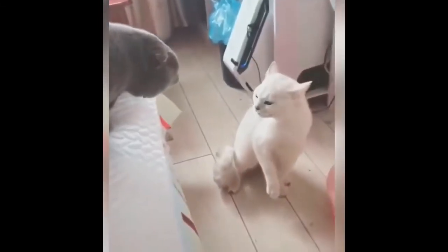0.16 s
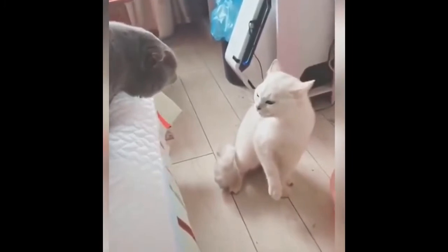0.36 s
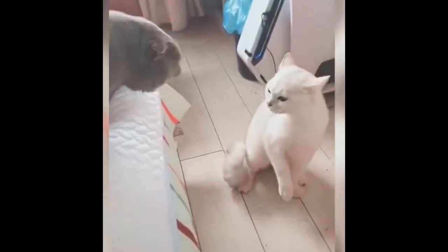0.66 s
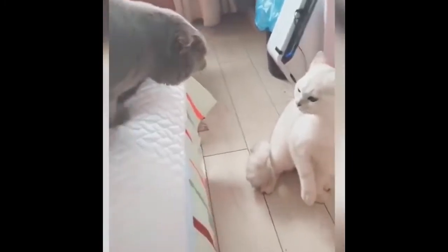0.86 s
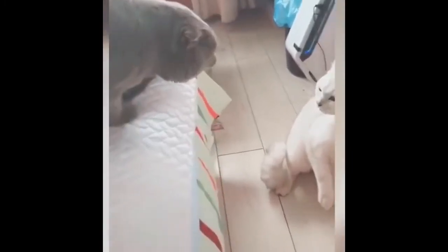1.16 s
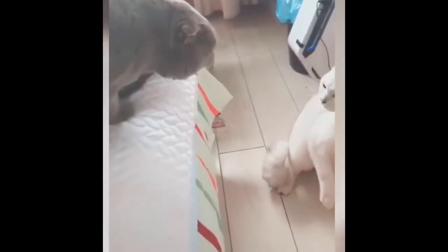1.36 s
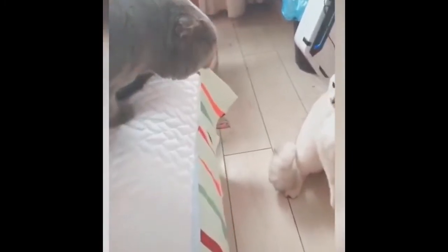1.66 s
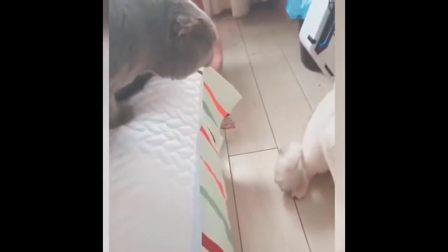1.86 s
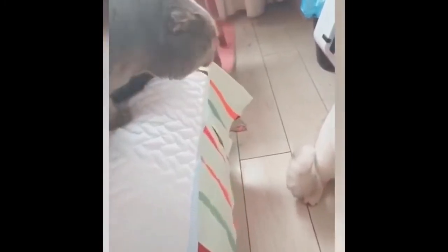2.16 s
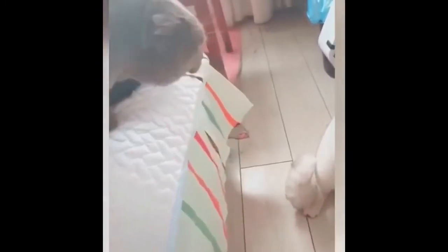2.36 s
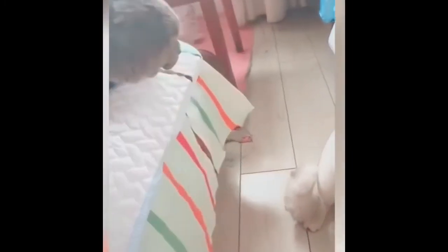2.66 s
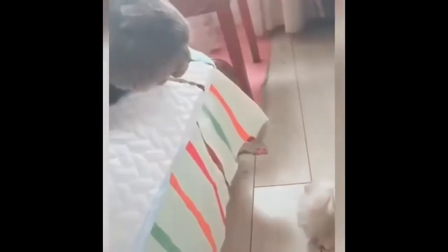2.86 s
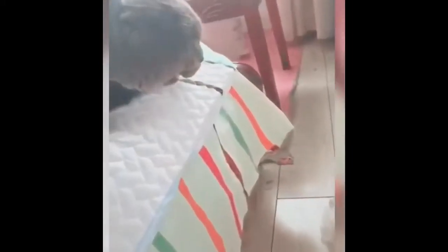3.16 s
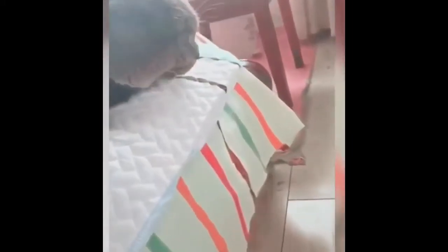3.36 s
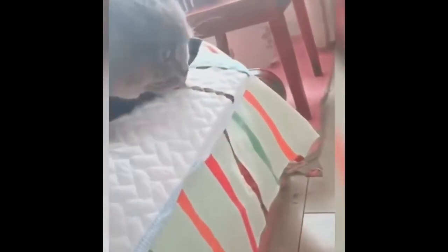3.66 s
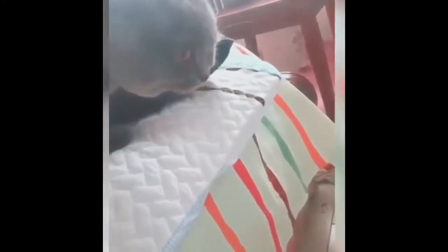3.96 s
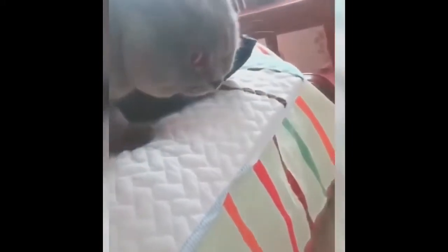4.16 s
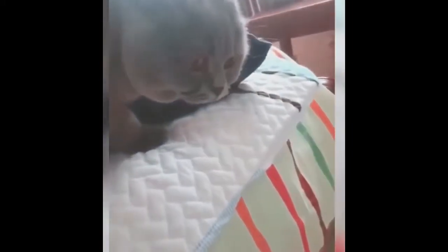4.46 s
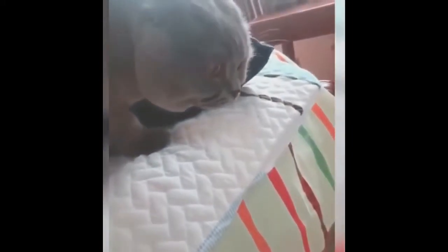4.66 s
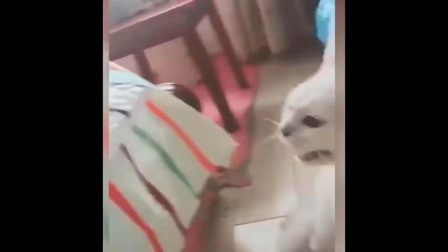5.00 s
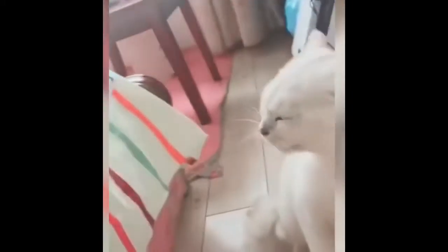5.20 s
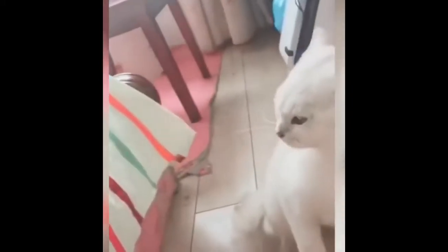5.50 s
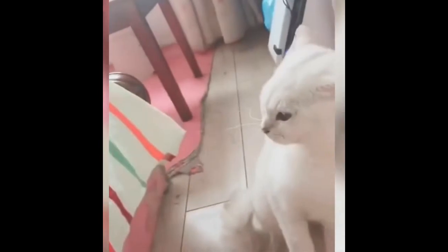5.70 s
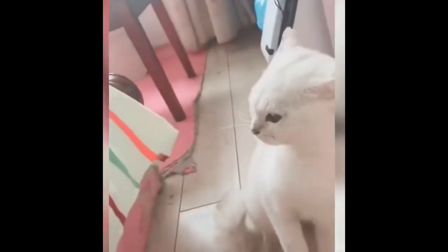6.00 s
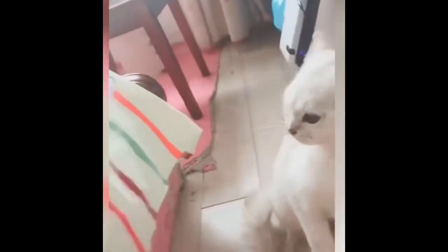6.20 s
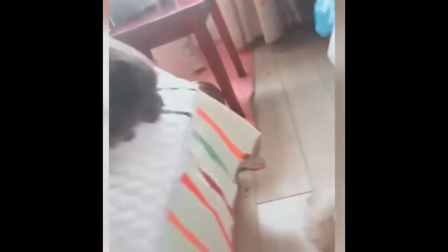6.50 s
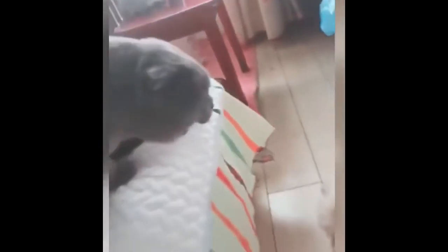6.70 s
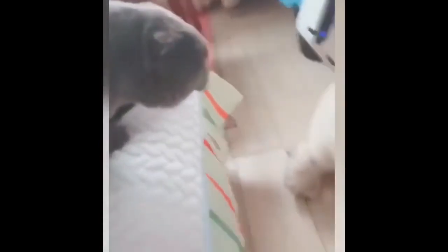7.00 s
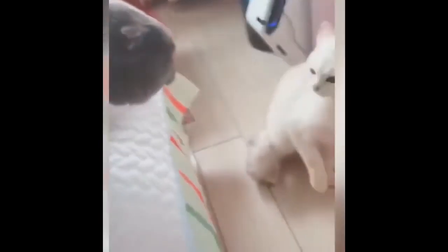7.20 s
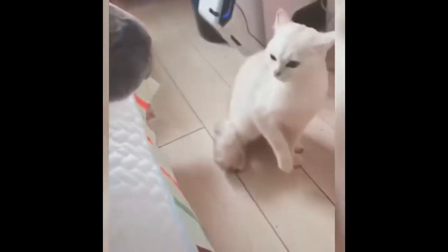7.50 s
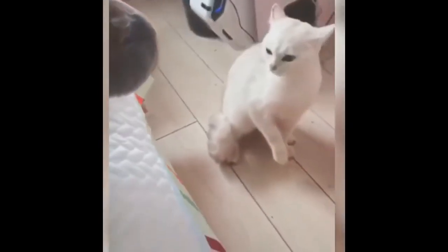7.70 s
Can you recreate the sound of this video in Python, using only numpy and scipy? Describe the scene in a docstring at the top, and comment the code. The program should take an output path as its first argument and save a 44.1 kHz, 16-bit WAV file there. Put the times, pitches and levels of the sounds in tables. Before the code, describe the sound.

Two cats face off indoors: one long, bright yowl, a lower answering moan, then a second raspy yowl breaking in.

```python
"""A small, hard-walled room where two cats face off. One gives two long, bright yowls that sink in
pitch as its mouth closes; in the pause the other starts a lower, rounder moan, and the second yowl
breaks in over it with a rasp. Each voice is vocal-fold harmonics and breath shaped by a moving mouth.
Floor and walls answer; room tone, a low hum, a faint whine, a soft bump and a few ticks lie underneath."""
import sys
import numpy as np
from scipy import signal
from scipy.fft import rfft, irfft, next_fast_len
from scipy.io import wavfile
from scipy.ndimage import uniform_filter1d, minimum_filter1d, map_coordinates

SR = 44100
rng = np.random.default_rng(int(sys.argv[2]) if len(sys.argv) > 2 else 0)


def waveform_to_disk(signal):
    """Save audio, clipped to [-1, 1], as 16-bit WAV at the path in sys.argv[1]."""
    frames = np.transpose(np.atleast_2d(signal))
    scaled = np.clip(frames, -1, 1) * 32767
    samples = np.round(scaled).astype(np.int16)
    wavfile.write(sys.argv[1], SR, samples)


N = 346185
MID_PITCH_HZ = 500  # the jaw follows the pitch: resonance centres are given at this pitch


def amp(db):
    """Decibels to gain."""
    return 10 ** (np.asarray(db) / 20)


def unit(x):
    """Scaled to rms 1."""
    return x / np.sqrt(np.mean(x ** 2) + 1e-20)


def along(points, hz):
    """(frequency, value) points read on a log axis."""
    f, v = np.transpose(points)
    return np.interp(np.log(hz + 1), np.log(f + 1), v)


def curves(rows, t):
    """Breakpoint envelopes: each column after the first, read at the times t."""
    times, *columns = np.transpose(rows)
    return [np.interp(t, times, column) for column in columns]


def swells(rows, t):
    """Sum of bell-shaped swells given as (time, half length, height)."""
    return sum(height * np.exp(-((t - s) / half_s) ** 2) for s, half_s, height in rows)


def wobble(rate, t):
    """A smooth random curve with rate knots a second."""
    return map_coordinates(rng.standard_normal(int(N * rate / SR) + 4), [t * rate], mode="nearest")


def filtered(x, response):
    """x through an EQ given as a function of frequency."""
    size = next_fast_len(len(x) + SR // 2)
    return irfft(rfft(x, size) * response(np.fft.rfftfreq(size, 1 / SR)), size)[:len(x)]


def band(hz, centre_hz, width_hz):
    """Response of one resonance."""
    return 1j * hz * width_hz / (centre_hz ** 2 - hz ** 2 + 1j * hz * width_hz)


# peaks and notches of the yowling cat's nose: (centre [Hz], half width [ratio], share of swell [ratio])
NOSE = [(1480, .13, -.3), (2780, .07, 1), (4400, .06, -.5), (5600, .16, .8)]


def vocal_tract(hz, mouth, throat, formants, lower_ratio, hinge_hz=1500):
    """Gain of the tract: four formants move with the jaw, the nose adds its own, pressing lifts treble."""
    mouth_hz, upper_hz, top_hz, bright_db, nasal_db = mouth
    centres = [lower_ratio * mouth_hz, mouth_hz, upper_hz, top_hz]
    moving = [(centre, *shape) for centre, shape in zip(centres, formants)]
    nasal = [(centre, width, share * nasal_db) for centre, width, share in NOSE]
    peaks_db = sum(db / (1 + (np.log(hz / centre) / width) ** 2) for centre, width, db in moving + nasal)
    shelf_db = bright_db * np.clip(np.log2(hz / hinge_hz) / 2, 0, 1)
    return amp(along(throat, hz) + shelf_db + peaks_db)


def hoarseness(spells, t, clear_db=(-52, -47)):
    """Gains of period doubling and of rasp: each spell swells and fades over the clear voice."""
    return amp(clear_db)[:, None] + swells([(s, half_s, amp(db)[:, None]) for s, half_s, *db in spells], t)


def cry(course, mouth, spells, throat, formants, lower_ratio, flutter_db, rasp_tilt_db, trim_db, release_s):
    """One cry: the harmonics of the vocal folds and their rasp, shaped by the moving mouth."""
    start = max(int(course[0][0] * SR), 0)
    end = min(int(course[-1][0] * SR) + SR // 100, N)
    t = np.arange(start, end) / SR
    slow = t[::SR // 200]  # control rate
    pitch, effort_db = curves(course, t)
    # the folds never hold their pitch exactly
    jitter = .002 * wobble(11, t) + .0026 * wobble(26, t) + .0014 * wobble(80, t)
    phase = 2 * np.pi * np.cumsum(pitch * (1 + jitter)) / SR
    multiples = np.arange(2, 80) / 2
    hz = multiples[:, None] * curves(course, slow)[0]
    gains = vocal_tract(hz, mouth(slow), throat, formants, lower_ratio) * (hz < SR / 2)
    gains /= np.linalg.norm(gains[::2], axis=0)
    # alternate strong and weak cycles put lines halfway between the harmonics, most of all in the treble
    doubling = hoarseness(spells, slow)[0] * amp(7.6 * np.log2(hz[1::2] / 2500))
    gains[1::2] *= np.minimum(doubling, amp(-4.5))
    tone = np.zeros(len(t))
    for k, gain in zip(multiples, gains):
        # high harmonics flutter more than low ones, and each lags a little, which spreads the pulse
        flutter = amp(flutter_db * min(k / 6, 1) * (wobble(16, slow) + .55 * wobble(55, slow)))
        tone += np.sqrt(2) * np.interp(t, slow, gain * flutter) * np.sin(k * phase - k * k / 5)
    # turbulence comes in one puff per cycle; it rises higher up the throat and feels the formants less
    puffs = rng.standard_normal(len(t)) * (1 + .84 * np.cos(phase))
    bins, frames, spectra = signal.stft(puffs, SR, nperseg=512)
    bins = bins[:, None] + 1
    colour = np.sqrt(vocal_tract(bins, mouth(frames + t[0]), throat, formants, lower_ratio))
    colour *= amp(rasp_tilt_db * np.log2(bins / 2000)) / (1 + (900 / bins) ** 4)
    colour /= np.linalg.norm(colour, axis=0)
    rasp = unit(signal.istft(spectra * colour, SR)[1][:len(t)])
    voice = amp(effort_db + trim_db) * (tone + hoarseness(spells, t)[1] * rasp)
    # a cry that starts from silence swells in, and every cry fades at its end
    attack = 1 - (start > 0) * np.exp(-(t - t[0]) / .025)
    release = 1 - np.exp((t - t[-1]) / release_s)
    return np.pad(voice * attack * release, (start, N - end))


# the cat presses harder and the voice brightens: (time [s], half length [s], treble lift [dB])
PRESSES = [(.15, .5, 7.5), (1.2, .1, 7.5), (2.95, .2, 5), (5.2, 0.23, 9), (5.85, 0.35, 9), (7.2, .28, 3)]
# the voice turns nasal: (time [s], half length [s], lift [dB])
NASAL_SWELLS = [(.2, 0.98, 2), (3.148, 0.33, 6.5), (5.42, .22, 1.5)]


def yowl_mouth(course, centres_hz, follows, gape, gape_s, held_drop, held_s, bright_db, let_go_s=.071):
    """A yowl starts gaping, then relaxes; its formants sink with a power of the pitch."""
    def mouth(t):
        height = curves(course, t)[0] / MID_PITCH_HZ
        mouth_hz, upper_hz, top_hz = [hz * height ** follow for hz, follow in zip(centres_hz, follows)]
        age = t - course[0][0]
        mouth_hz *= 1 + gape * np.exp(-(age / gape_s) ** 4)
        # the upper formant stays low while the opening note is held
        held = (1 - np.tanh((age - held_s) / let_go_s)) / 2
        upper_hz *= 1 - held_drop * held
        return mouth_hz, upper_hz, top_hz, bright_db + swells(PRESSES, t), swells(NASAL_SWELLS, t)
    return mouth


def scooped(course, start_s, start_hz, start_db, glide_s):
    """The course with a scoop in front: the pitch shoots up and levels off as the level climbs evenly."""
    join_s, join_hz, join_db = course[0]
    t = np.arange(start_s, join_s - .01, .01)
    pitch = join_hz + (start_hz - join_hz) * np.exp(-(t - start_s) / glide_s)
    level_db = np.interp(t, [start_s, join_s], [start_db, join_db])
    return np.vstack([np.column_stack([t, pitch, level_db]), course])


# melody and dynamics of each yowl: (time [s], pitch [Hz], relative level [dB])
FIRST_YOWL = [(0.0, 643, -16), (0.05, 672, -14), (0.11, 691, -20.5), (0.13, 690.8, -15.5),
              (0.37, 694.9, -18.5), (0.64, 699.4, -16), (1.24, 676.5, -17), (1.31, 656.4, -16.5),
              (1.36, 644, -20.5), (1.52, 606, -20), (1.61, 579.5, -17), (1.69, 528, -22.5),
              (1.88, 509.6, -20), (2.05, 527.4, -19.5), (2.43, 424.3, -22.5), (2.88, 392.6, -26.5),
              (3.4, 381.2, -23), (3.46, 358.4, -35)]
SECOND_YOWL = [(5.28, 535.4, -17.5), (5.35, 553.8, -17.5), (5.69, 594.8, -15.5), (6.01, 611.3, -16),
               (6.4, 585.8, -17), (6.53, 557.4, -19.5), (6.7, 536.5, -21.5), (6.81, 493.3, -18),
               (6.98, 473, -21.5), (7.13, 451.2, -23), (7.23, 452.5, -20), (7.37, 443.3, -17.5),
               (7.41, 447, -20), (7.61, 441.1, -18.5), (7.81, 457.7, -20), (7.85, 451.4, -15.5)]
# each yowl's vowel, as lower, mouth, upper and top formant: (half width [ratio], lift [dB])
FIRST_FORMANTS = [(0.18, 7.5), (0.2, 24), (0.18, 15), (0.14, 9)]
SECOND_FORMANTS = [(0.045, 8.9), (0.16, 23.6), (0.12, 19.5), (0.18, 3.5)]
# steady colour of the first cat's throat and head: (frequency [Hz], gain [dB])
YOWL_THROAT = [(385, 4), (440, -8), (490, -14), (700, -6), (1200, 0), (2000, 0), (2700, -4), (3300, -13),
               (4200, -9), (5200, -5), (7000, -12), (9000, -21), (11000, -16), (14000, -23)]
# spells of grit in the yowls: (time [s], half length [s], period doubling [dB], rasp [dB])
YOWL_GRIT = [(0, .08, -30, -30), (1.7, .4, -50, -37), (3.15, .45, -48, -34), (3.46, .025, -15, -12),
             (5.25, .1, -7, -32), (5.48, .28, -13, -36), (6.62, .11, -23, -34), (7.86, .18, -6, -30)]


def yowls():
    """The first cat's two long, bright cries; the earlier is more nasal, the later gapes wider."""
    later = scooped(SECOND_YOWL, start_s=5.07, start_hz=350, start_db=-36, glide_s=.05)
    nasal = yowl_mouth(FIRST_YOWL, centres_hz=(1740, 3230, 6800), follows=(.82, .62, .15),
                       gape=.077, gape_s=.78, held_drop=.19, held_s=1.293, bright_db=-9.5)
    gaping = yowl_mouth(later, centres_hz=(1920, 3480, 7700), follows=(.85, .72, .7),
                        gape=.19, gape_s=.8, held_drop=.032, held_s=.67, bright_db=-9)
    first = cry(FIRST_YOWL, nasal, YOWL_GRIT, YOWL_THROAT, FIRST_FORMANTS, lower_ratio=.51,
                flutter_db=2.5, rasp_tilt_db=-3, trim_db=-.82, release_s=.00487)
    second = cry(later, gaping, YOWL_GRIT, YOWL_THROAT, SECOND_FORMANTS, lower_ratio=.503,
                 flutter_db=1.82, rasp_tilt_db=-2, trim_db=-.23, release_s=.00081)
    return first + second


def moan_mouth(course, centres_hz, follow, bright_db, opens_at_s=4.76, ease_s=.049):
    """A moan starts with the mouth nearly shut; opening it lifts the formants and the treble."""
    def mouth(t, rise_octaves=.5, rise_db=17.5):
        opened = (1 + np.tanh((t - opens_at_s) / ease_s / 2)) / 2
        lift = (curves(course, t)[0] / MID_PITCH_HZ) ** follow * 2 ** (rise_octaves * opened)
        return *[hz * lift for hz in centres_hz], bright_db + rise_db * opened, 0
    return mouth


# melody and dynamics of each moan: (time [s], pitch [Hz], relative level [dB])
FAINT_MOAN = [(0, 354, -58.5), (.4, 371, -58.5), (.7, 315, -55)]
ANSWERING_MOAN = [(4.35, 310.1, -52.5), (4.502, 360.7, -31.5), (4.688, 391.3, -27.5), (4.8, 398.2, -16),
                  (5.166, 416, -23.5), (5.236, 402, -29), (5.338, 364.6, -38), (5.362, 274, -38),
                  (5.38, 279, -30)]
# the moans' vowel, as lower, mouth, upper and top formant: (half width [ratio], lift [dB])
MOAN_FORMANTS = [(0.17, 20), (.18, 31.2), (0.078, 18), (0.04, 2)]
# steady colour of the second cat's throat and head: (frequency [Hz], gain [dB])
MOAN_THROAT = [(330, 6.5), (750, 12.5), (1200, 19.5), (1600, 6), (2500, 1), (3700, -0.5), (4400, 4),
               (5300, -7.5), (8000, -21), (12000, -21.5)]
# spells of grit in the answer: (time [s], half length [s], period doubling [dB], rasp [dB])
MOAN_GRIT = [(4.35, .1, -30, -28), (4.88, .26, -36, -30)]


def moans():
    """The second cat: a faint closed-mouth moan at first; later it answers, opening its mouth midway."""
    shut = moan_mouth(FAINT_MOAN, centres_hz=(640, 2600, 5600), follow=.68, bright_db=-12.5)
    opening = moan_mouth(ANSWERING_MOAN, centres_hz=(1020, 2520, 4700), follow=.65, bright_db=-4)
    return sum(cry(course, mouth, MOAN_GRIT, MOAN_THROAT, MOAN_FORMANTS, lower_ratio=.57,
                   flutter_db=3, rasp_tilt_db=-1.5, trim_db=.8, release_s=.025)
               for course, mouth in [(FAINT_MOAN, shut), (ANSWERING_MOAN, opening)])


# dark colour of the room's air: (frequency [Hz], relative level [dB])
AIR_COLOUR = [(25, 0), (50, -5.5), (91, -4), (129, -18), (293, -18), (436, -27), (964, -26.5),
              (2250, -32.5), (2800, -31.5), (4130, -35.5), (5830, -41.5), (14000, -42)]
# fader ride of the low hum: (time [s], level [dB])
HUM_RIDE = [(0, -55), (1.9, -50), (3.6, -54), (6, -61), (7.85, -62)]


def room_tone(air_db=-53):
    """A quiet bed of noise, with a narrow band of bass noise that wavers as a hum."""
    air = unit(filtered(rng.standard_normal(N), lambda hz: amp(along(AIR_COLOUR, hz))))
    hum = unit(filtered(rng.standard_normal(N), lambda hz: band(hz, centre_hz=49, width_hz=5) ** 2))
    return amp(air_db) * air + amp(curves(HUM_RIDE, np.arange(N) / SR)[0]) * hum


def whine(start_s=2.5, length_s=.33, pitch_hz=2837, peak_db=-60):
    """A faint, thin, slightly unsteady tone that swells and fades."""
    t = np.arange(N) / SR
    swell = np.sin(np.pi * np.clip((t - start_s) / length_s, 0, 1))
    pitch = pitch_hz * (1 + .006 * wobble(40, t))
    return amp(peak_db) * swell * np.sin(2 * np.pi * np.cumsum(pitch) / SR)


# ticks and a soft bump: (time [s], level [dB], ring [Hz], 60 dB decay [s])
KNOCKS = [(2.715, -45.5, 918, 0.066), (2.735, -48, 262.4, 0.17), (3.788, -59, 2500, 0.15),
          (4.002, -47, 1160, 0.037)]


def knocks():
    """Small contacts with the furniture: short noise bursts, each in one broad resonance."""
    out = np.zeros(N + SR)
    t = np.arange(SR // 2) / SR
    for start_s, db, ring_hz, t60 in KNOCKS:
        ring = unit(filtered(rng.standard_normal(len(t)), lambda hz: band(hz, ring_hz, .25 * ring_hz)))
        out[round(start_s * SR):][:len(t)] += amp(db - 60 * t / t60) * ring
    return out[:N]


# the room's short tail, dying fastest on top: (frequency [Hz], 60 dB decay [s])
ROOM_DECAY = [(200, 0.38), (2000, 0.42), (6000, 0.089), (13000, 0.024)]


def room(x, tail_db=-21, early_db=-14, early_t60=.2, beam_hz=4200):
    """Near surfaces answer at once, then a short tail; treble is beamed away, so more of it reflects."""
    hz, t, spectra = signal.stft(rng.standard_normal(SR // 2), SR, nperseg=256)
    tail = signal.istft(spectra * amp(-60 * t / along(ROOM_DECAY, hz)[:, None]), SR)[1]
    lag = np.arange(len(tail)) / SR
    early = rng.standard_normal(len(tail)) * amp(-60 * lag / early_t60)
    answer = amp(tail_db) * tail / np.linalg.norm(tail) + amp(early_db) * early / np.linalg.norm(early)
    answer = np.pad(answer, (SR // 300, 0))  # pre-delay
    answer = filtered(answer, lambda f: 1 + 3 * f ** 4 / (f ** 4 + beam_hz ** 4))
    return x + signal.fftconvolve(x, answer)[:N]


def scene():
    """Both cats and the small sounds ring in the room, over its bed of room tone."""
    return (room(yowls() + moans() + knocks() + whine()) + room_tone())[None]


def record(dry, ceiling=.5, low_cut_hz=32., top_hz=14050):
    """A phone's limiter ducks the highest peaks; its filters drop the deepest bass and the very top."""
    needed = ceiling / np.maximum(np.abs(dry[0]), ceiling)
    gain = uniform_filter1d(minimum_filter1d(needed, size=1200), size=600)
    return filtered(dry[0] * gain, lambda hz: (hz < top_hz) * hz ** 8 / (hz ** 8 + low_cut_hz ** 8))[None]


dry = scene()
out = record(dry)
waveform_to_disk(out)
```